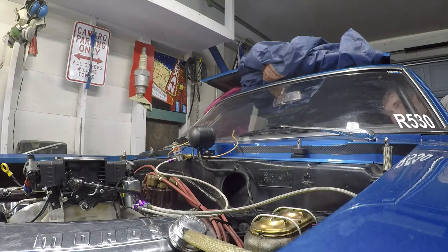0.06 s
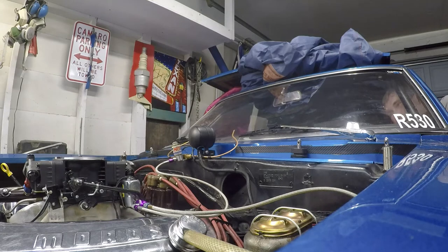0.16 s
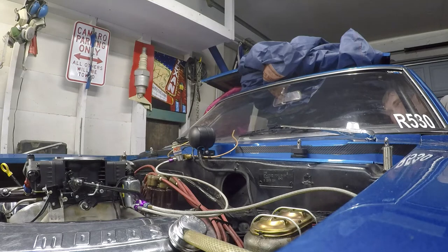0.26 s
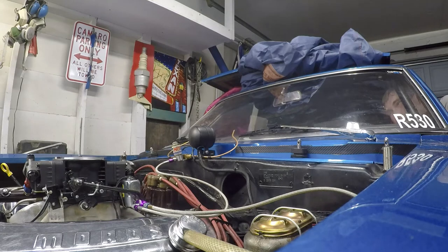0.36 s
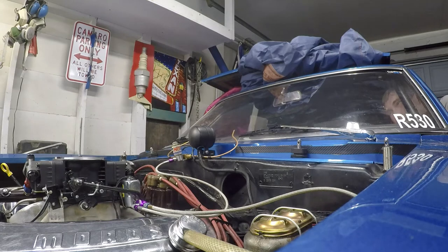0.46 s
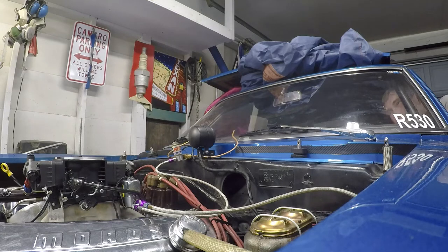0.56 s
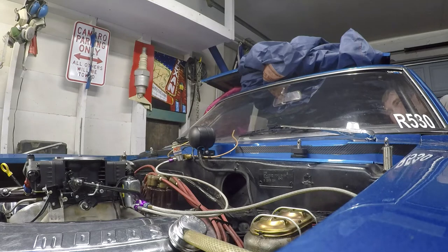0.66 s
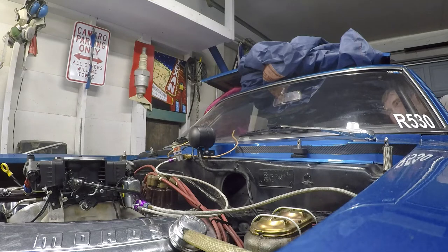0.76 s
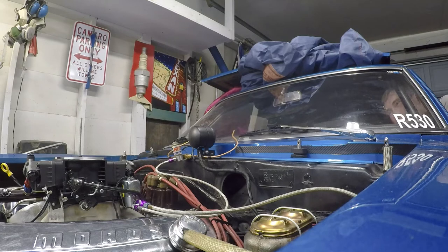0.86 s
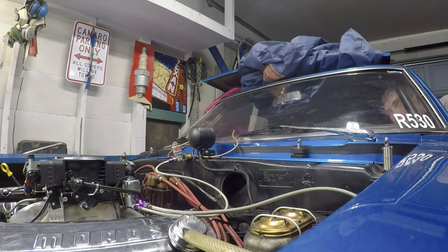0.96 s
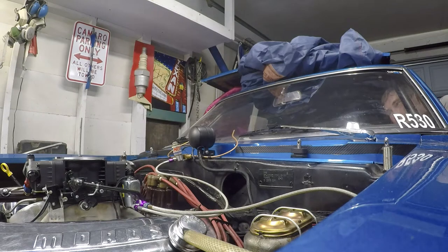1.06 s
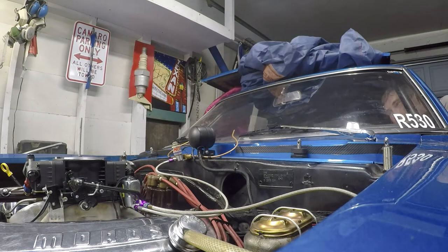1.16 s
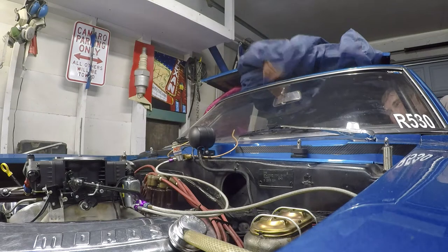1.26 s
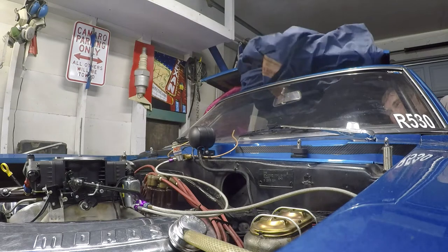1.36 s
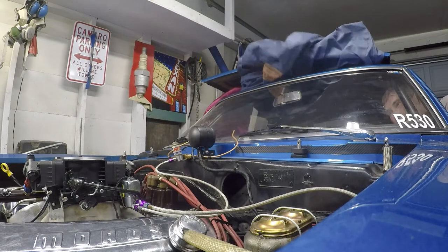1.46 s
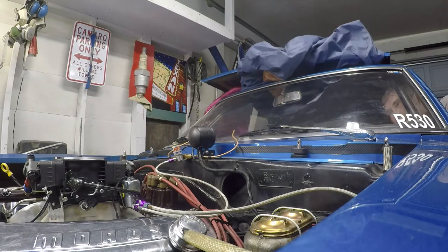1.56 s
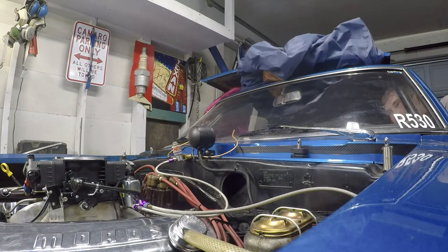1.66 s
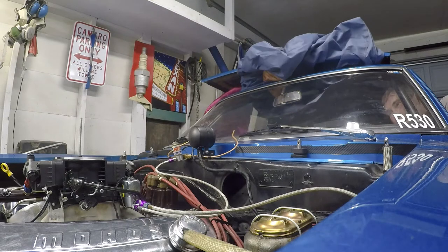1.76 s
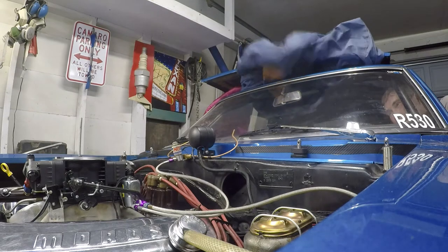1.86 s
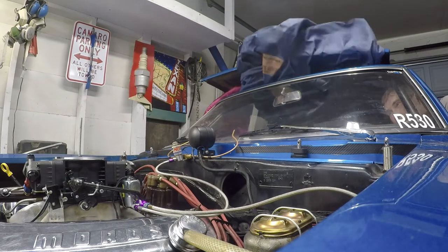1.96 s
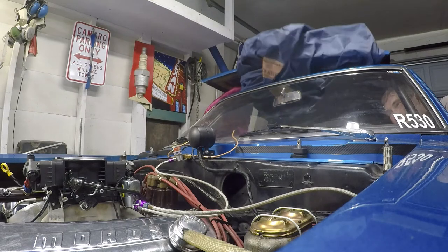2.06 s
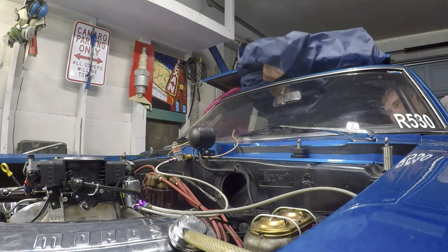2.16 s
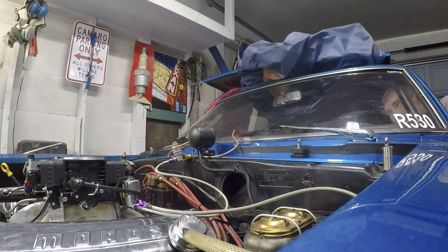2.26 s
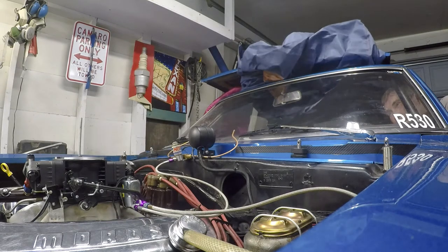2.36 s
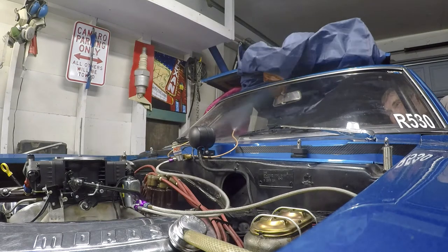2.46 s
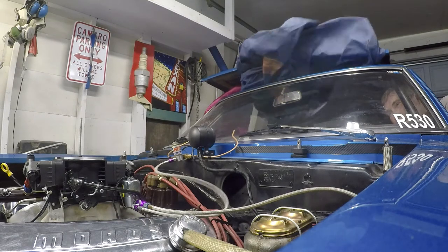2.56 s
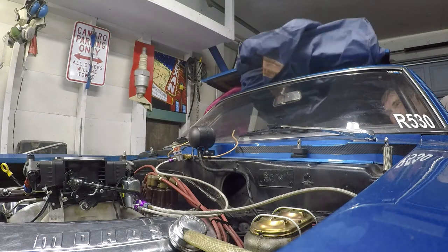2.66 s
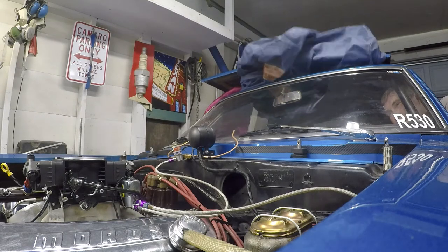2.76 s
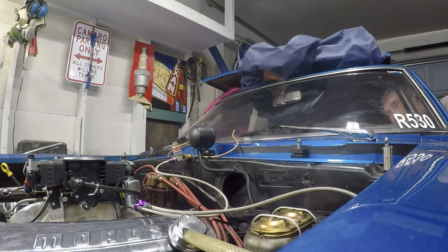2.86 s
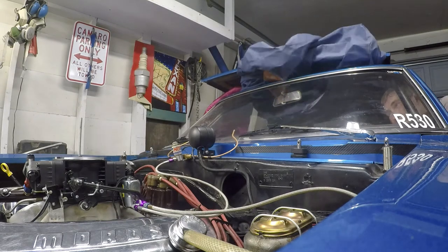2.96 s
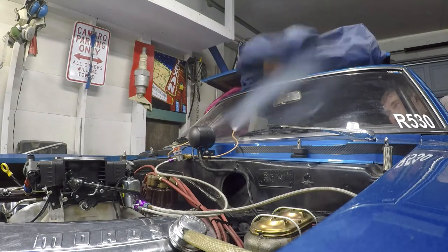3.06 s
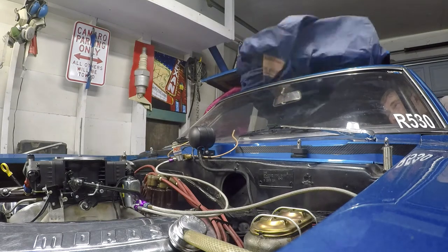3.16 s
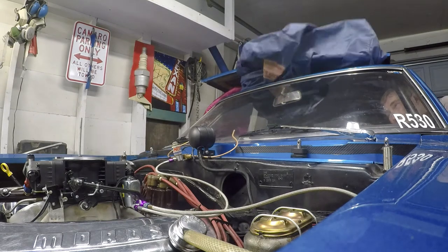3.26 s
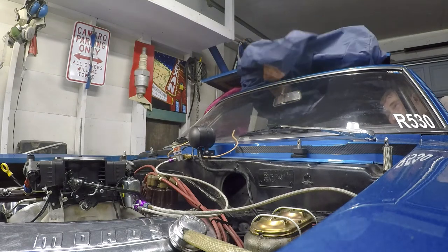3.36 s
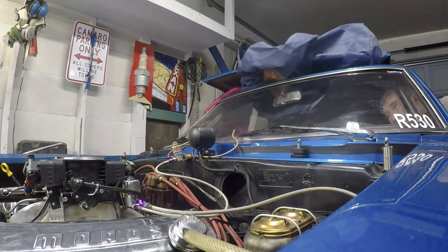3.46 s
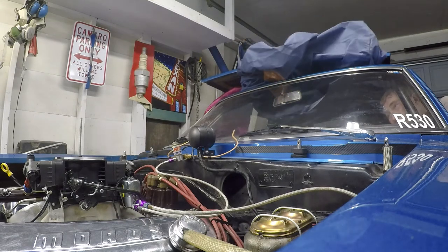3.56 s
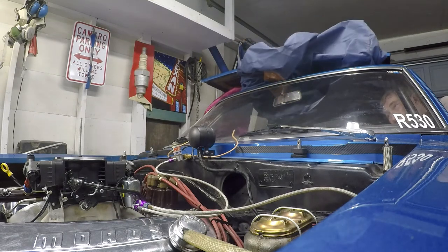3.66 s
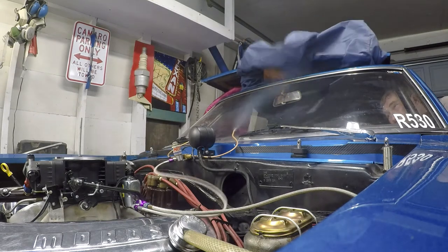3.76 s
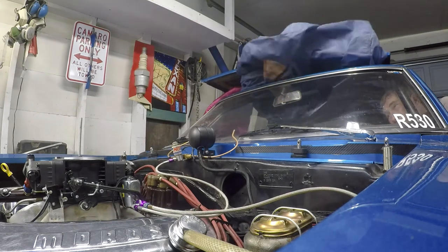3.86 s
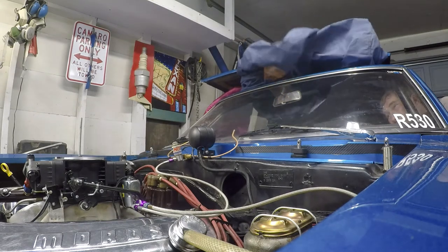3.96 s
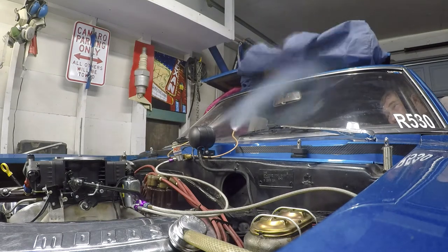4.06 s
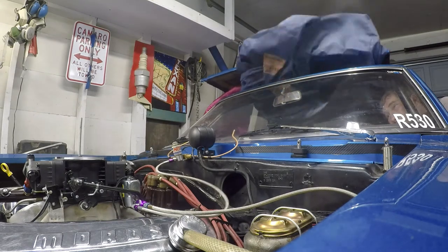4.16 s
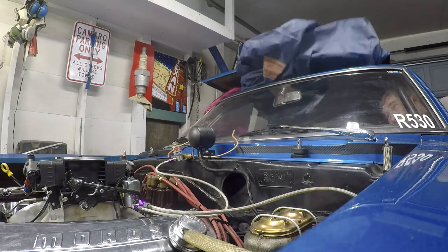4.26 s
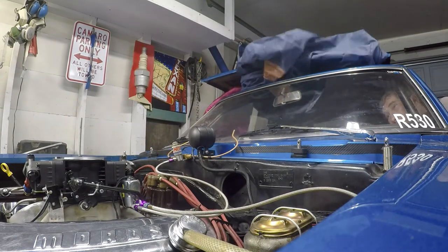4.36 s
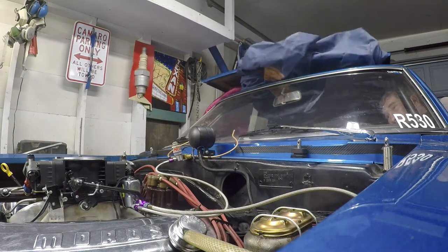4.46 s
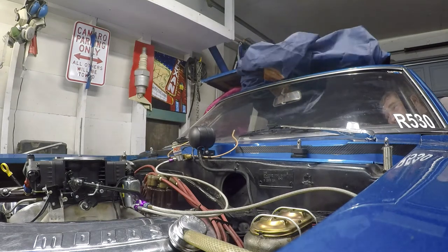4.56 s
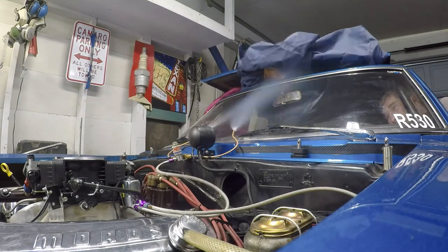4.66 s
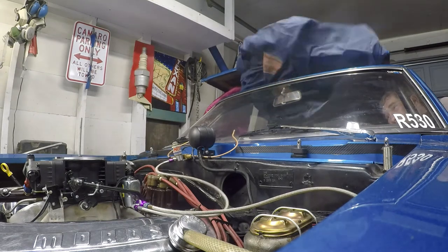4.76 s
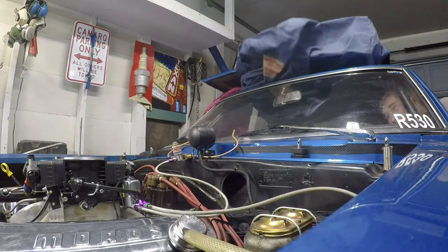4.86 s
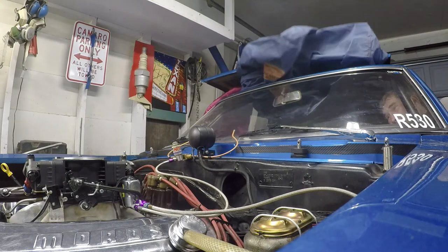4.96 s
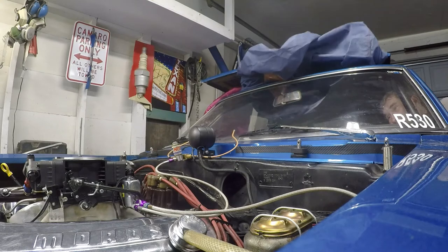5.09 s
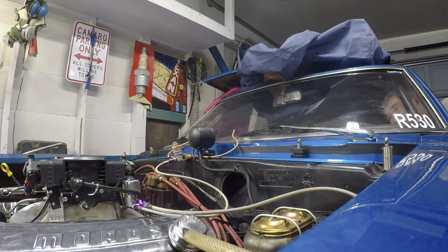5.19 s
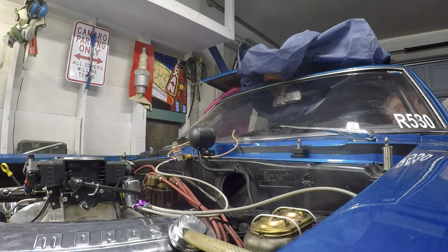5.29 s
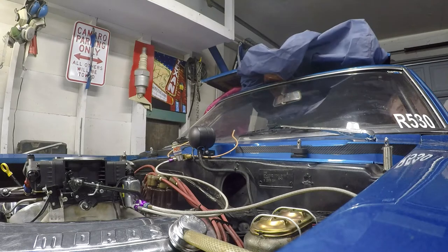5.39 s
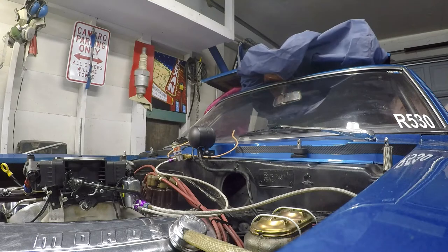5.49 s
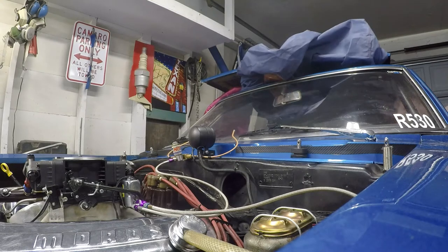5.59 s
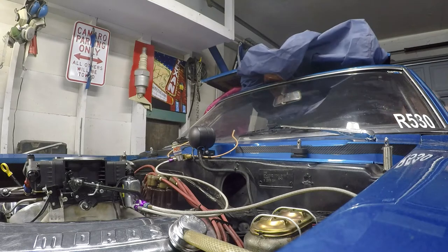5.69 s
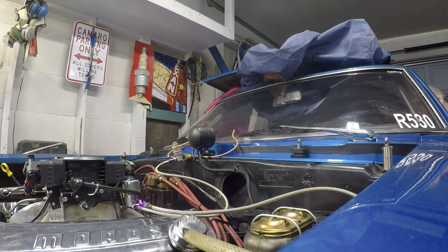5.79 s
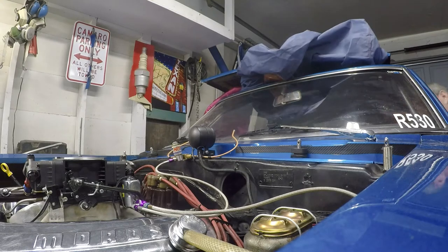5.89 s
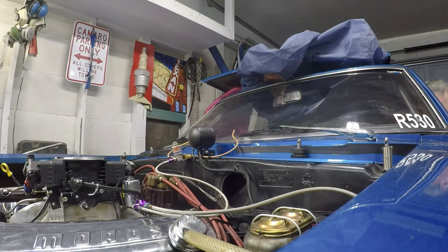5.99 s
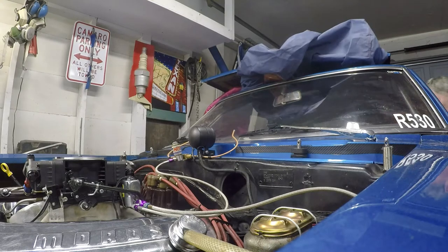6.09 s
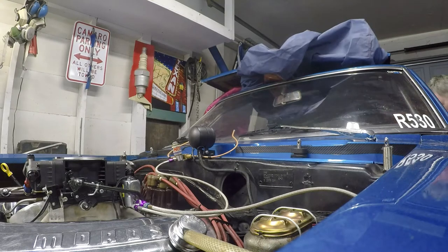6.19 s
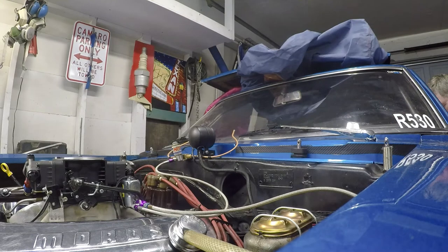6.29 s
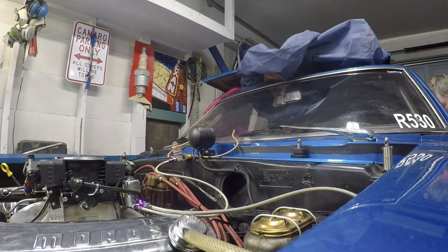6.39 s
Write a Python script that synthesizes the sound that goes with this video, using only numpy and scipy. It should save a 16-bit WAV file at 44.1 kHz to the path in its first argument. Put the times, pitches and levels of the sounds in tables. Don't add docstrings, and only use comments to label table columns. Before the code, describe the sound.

Seven short, loud bursts of pressurised gas hiss from a car's purge valve, each snapping open with a thump and ringing through a small garage.

```python
import sys
import numpy as np
from scipy import signal
from scipy.fft import rfft, irfft, next_fast_len
from scipy.io import wavfile
from scipy.ndimage import uniform_filter1d

SR = 44100
rng = np.random.default_rng(int(sys.argv[2]) if len(sys.argv) > 2 else 0)


def how_loud(loudness_db):
    steps = np.asarray(loudness_db, float) / 20
    return 10 ** steps


def unload_wav(signal):
    wavfile.write(
        sys.argv[1],
        SR,
        np.round(np.clip(np.atleast_2d(signal).T, -1, 1) * 32767).astype(np.int16),
    )


N = 283563
TIME = np.arange(N) / SR
SIZE = next_fast_len(N)
FREQ = np.maximum(np.arange(SIZE // 2 + 1) * SR / SIZE, 1)

# (opens [s], closes [s])
VALVE_TIMES = [
    (1.2567, 1.3412),
    (1.8643, 1.9745),
    (2.4977, 2.588),
    (3.0545, 3.130),
    (3.7808, 3.820),
    (4.0763, 4.159),
    (4.6968, 4.773),
]
FIRST_OPENING_S = VALVE_TIMES[0][0]
BREAK_OUT_S = .0029


def unit(x):
    return x / np.sqrt(np.mean(x ** 2))


def along(table, hz):
    f, value = np.transpose(table)
    return np.interp(np.log(hz), np.log(f), value)


def noise(gain):
    spectrum = rfft(rng.standard_normal(SIZE)) * gain
    return unit(irfft(spectrum, SIZE)[:N])


def band(hz, width):
    return 1 / np.sqrt(1 + ((FREQ - hz ** 2 / FREQ) / width) ** 2)


def walk(rate):
    hold = int(SR / rate)
    steps = np.repeat(rng.standard_normal(N // hold + 1), hold)
    return unit(uniform_filter1d(uniform_filter1d(steps, hold), hold)[:N])


def linger(power, t60):
    kept = 10 ** (-6 / (t60 * SR))
    return signal.lfilter([1 - kept], [1, -kept], power)


def heard(colour, gain, tilt_db=0., direct_db=-4, early_t60=0.2, late_db=-3, patchy_db=1.5):
    # (frequency [Hz], t60 [s])
    garage_t60 = [(60, 0.85), (150, 0.74), (400, 0.68), (1000, 0.6), (2500, 0.49), (5000, 0.48),
                  (9000, .42), (15000, .32)]
    out, total = 0, np.sum(colour ** 2)
    for hz in 44 * 2 ** np.arange(0, 8.6, .5):
        part = colour * np.cos(np.pi * np.clip(np.log2(FREQ / hz), -.5, .5))
        share = np.sum(part ** 2) / total
        if share > 3e-4:
            level_db = tilt_db * np.log2(hz / 5000) + patchy_db * walk(30)
            power = share * (gain * how_loud(level_db)) ** 2
            direct = how_loud(direct_db) ** 2 * power
            early = linger(power, early_t60)
            late = how_loud(late_db) ** 2 * linger(power, along(garage_t60, hz))
            out = out + np.sqrt(direct + early + late) * noise(part)
    return out


def air():
    # (frequency [Hz], level [dB per Hz])
    floor_colour = [(13, -30), (22, -2.5), (43, -4), (55, -11.5), (132, -18), (156, -24.5), (236, -26.5),
                    (263, -30), (457, -33.5), (524, -44.5), (771, -38.5), (14300, -55), (16000, -55.5)]
    colour = how_loud(along(floor_colour, FREQ))
    low = 1 / (1 + (FREQ / 300) ** 4)
    shaken_s = 0.74
    shakes = sum((TIME > start) * np.exp(-np.abs(TIME - start) / shaken_s) for start, _ in VALVE_TIMES)
    rumble = how_loud(-50 + 6 * np.tanh(shakes) + 1.3 * walk(13)) * noise(colour * low)
    return rumble + how_loud(-66) * noise(colour * (1 - low))


def rustles():
    # (time [s], rise [s], fall [s], dull part [dB], crisp part [dB])
    cloth_moves = [
        (0.0, .01, 0.069, -59.5, -65),
        (.48, 0.029, .06, -74, -70),
        (5.47, .03, .09, -68, -80),
        (5.65, .03, .05, -70.5, -66),
        (6.2, .12, 0.18, -67, -77),
        (6.43, 0.11, .1, -64.5, -75.5),
    ]
    dull, crisp = how_loud(-74), how_loud(-73)
    for at, rise, fall, dull_db, crisp_db in cloth_moves:
        shape = np.exp(-np.abs(TIME - at) / np.where(TIME < at, rise, fall))
        dull = dull + how_loud(dull_db) * shape
        crisp = crisp + how_loud(crisp_db) * shape
    return dull * noise(band(470, 880) ** 2) + crisp * noise(band(3000, 4000) ** 2)


def knock():
    # (frequency [Hz], width [Hz], level [dB])
    knock_modes = [(460, 24, -2), (920, 60, 0), (1290, 28, -4), (1824, 39, -1), (2360, 51, -4),
                   (2860, 62, -2), (3130, 54, -4)]
    body = np.sqrt(sum((how_loud(db) * band(hz, 2.3 * width) ** 2) ** 2 for hz, width, db in knock_modes))
    return how_loud(-55 - 60 * TIME / 0.42) * noise(body)


def ticks():
    # (time [s], peak [dB])
    metal_ticks = [
        (1.0984, -56),
        (2.388, -57),
        (3.678, -53),
        (4.6466, -54),
        (6.259, -58),
    ]
    out = np.zeros(N)
    grit = noise(band(3200, 7000))
    for at, db in metal_ticks:
        out += how_loud(db - 0.5) * (TIME > at) * np.exp(-np.clip(TIME - at, 0, None) / 0.0012) * grit
    return out


def vents():
    # (hiss [dB], liquid roar at opening [dB], at closing [dB], rumble [dB], far echo [dB])
    vent_charge = [
        (-17.5, -27, -29.5, -24.5, -56.5),
        (-16.5, -33, -21, -26, -45),
        (-16.5, -27, -22, -26, -45.5),
        (-16.5, -21.5, -28.5, -29.5, -44),
        (-15.5, -16, -25, -23, -55),
        (-16.5, -23, -28, -26, -49),
        (-14.5, -18.5, -29, -25, -47),
    ]
    flush_s = .45
    return [(start, closes - start, *levels, np.exp(-(start - FIRST_OPENING_S) / flush_s))
            for (start, closes), levels in zip(VALVE_TIMES, vent_charge)]


def thumps():
    # (delay [ms], signed gain)
    thump_bounces = [(2.2, .2), (5.0, -1.0), (9.4, .8), (15.2, .75), (24.3, .35), (30.6, -.8), (36.2, -.3),
                     (47.3, .3)]
    boom_hz, boom_lag_s, boom_swell_s, usual_hold_s = 30.1, .006, 0.12, .08
    out = np.zeros(N)
    for start, held, _, first_db, last_db, *_, dry in vents():
        push = how_loud(-14 + 3 * dry)
        for ms, gain in thump_bounces:
            out += gain * push * np.exp(-.5 * ((TIME - start - ms / 1000) / .0012) ** 2)
        slam = how_loud(-17 + 0.68 * (last_db - first_db))
        out += slam * np.exp(-.5 * ((TIME - start - held) / .002) ** 2)
        t = np.clip(TIME - start - boom_lag_s, 0, None)
        swell = 1 - np.exp(-(t / boom_swell_s) ** 2)
        ring = how_loud(-60 * t / 0.97) + how_loud(-10 - 60 * t / 3.0)
        boom = how_loud(-20.5 - 2 * np.log2(held / usual_hold_s))
        out += boom * ring * swell * np.sin(2 * np.pi * boom_hz * t)
    return out


def flow(start, held, rise=.0004, fall=.012, leak_db=-11):
    t = TIME - start
    opening = how_loud(leak_db) * (t > 0) + 1 - np.exp(-np.clip(t - BREAK_OUT_S, 0, None) / rise)
    return opening * np.exp(-np.clip(t - held, 0, None) / fall)


def gas_gate(start, held, dry):
    pinch_s, bleed_s = 0.0026, .014
    return how_loud(-4.5) * flow(start, held - pinch_s, fall=bleed_s, leak_db=-11 + 5.5 * dry)


def far_echo():
    far = np.zeros(N)
    for start, held, *_, far_db, dry in vents():
        far += how_loud(far_db) * flow(start + 0.22, held, rise=0.037, fall=0.041, leak_db=-43.5)
    echo = heard(band(490, 1100) ** 2, far, late_db=2.0, patchy_db=3.0)
    return echo + heard(band(70, 120) ** 2, how_loud(1.5) * far, late_db=3.0)


def rumble():
    gain = np.zeros(N)
    for start, held, *_, rumble_db, _, dry in vents():
        gain += how_loud(rumble_db) * gas_gate(start, held, dry)
    out = heard(band(120, 200) ** 2 + 0.21 * band(330, 60) ** 2, gain, late_db=-6.0)
    out += heard(band(87, 90) ** 2, how_loud(-13.5) * gain, late_db=7)
    mode = np.sqrt(linger((how_loud(-8.0) * gain) ** 2, 1.3)) * how_loud(2.1 * walk(20))
    return out + mode * noise(band(158, 60) ** 3)


def tube_roar():
    # (frequency [Hz], width [Hz], level [dB])
    tube_modes = [(470, 120, -2.5), (894, 340, 0), (1214, 610, -1.5), (1750, 140, -7)]
    roar, tone = np.zeros((2, N))
    for start, held, _, first_db, last_db, *_, dry in vents():
        gate = gas_gate(start, held, dry)
        change_db = last_db - first_db
        wetter_db = change_db * np.clip(np.clip(TIME - start, 0, None) / held, 0, 1)
        roar += how_loud(first_db + wetter_db) * gate
        tone += how_loud(-25 - 20 * dry + 0.77 * (wetter_db - .5 * change_db)) * gate
    modes = np.sqrt(sum((how_loud(db) * band(hz, width)) ** 2 for hz, width, db in tube_modes))
    out = heard(modes * band(900, 1500), roar * how_loud(0.5 * walk(40)))
    return out + heard(band(656, 110) ** 2, tone, late_db=-9, patchy_db=0.5)


def snaps():
    out = np.zeros(N)
    for start, _ in VALVE_TIMES:
        t = TIME - start - .0003
        click = (TIME > start + .0003) * np.exp(-np.clip(t, 0, None) / .0006)
        out += how_loud(-16.5) * click * noise(band(10500, 6000) ** 2)
    return out


def hiss():
    # (frequency [Hz], level [dB per Hz])
    jet_colour = [(820, -27), (1400, -3.5), (2280, -3), (3160, 0), (4960, 0.5), (5490, 0), (8330, -2.5),
                  (11000, -3), (15200, -7), (16000, -25.5)]
    gain, tilt_db = np.zeros((2, N))
    for start, held, hiss_db, *_, dry in vents():
        t = np.clip(TIME - start, 0, None)
        share = 1.15 - .14 * (start - FIRST_OPENING_S)
        surge = 1 + share * np.exp(-t / 0.019)
        surge += 1.3 * (1 - dry) * (t > BREAK_OUT_S) * np.exp(-np.abs(t - BREAK_OUT_S) / .004)
        gain += how_loud(hiss_db) * surge * gas_gate(start, held, dry)
        tilt_db[TIME > start] = 1.36 * dry
    out = heard(how_loud(along(jet_colour, FREQ)), gain * how_loud(1.5 * walk(60)), tilt_db)
    first_start, first_held = vents()[0][:2]
    return out + heard(band(9900, 1800) ** 2, how_loud(-27) * flow(first_start, first_held))


def jet():
    out = far_echo() + rumble() + tube_roar() + snaps() + hiss()
    panels = how_loud(-38 - 60 * TIME[:4000] / .15) * rng.standard_normal(4000)
    return out + signal.fftconvolve(out, panels)[:N]


def scene():
    since = np.array([np.where(TIME > start, TIME - start, 99) for start, _ in VALVE_TIMES]).min(axis=0)
    duck = how_loud(-5 * np.exp(-since / 0.52))
    background = air() + rustles() + knock() + ticks()
    mono = duck * background + thumps() + jet()
    return np.array([mono, mono])


def top_cut(x):
    return signal.sosfilt(signal.butter(12, 16630, fs=SR, output="sos"), x)


def record(dry):
    x = signal.sosfilt(signal.butter(2, 14, "high", fs=SR, output="sos"), dry)
    grit = signal.sosfilt(signal.butter(1, 1500, fs=SR, output="sos"), x[0] * rng.standard_normal(N))
    x = np.tanh(.85 * x) / .85
    x = x + how_loud(-42.5) * np.outer([1, -1], grit)
    x = signal.sosfilt(signal.ellip(12, .2, 90, 15280, fs=SR, output="sos"), x)
    return top_cut(x)


dry = scene()
out = record(dry)
unload_wav(out)
```